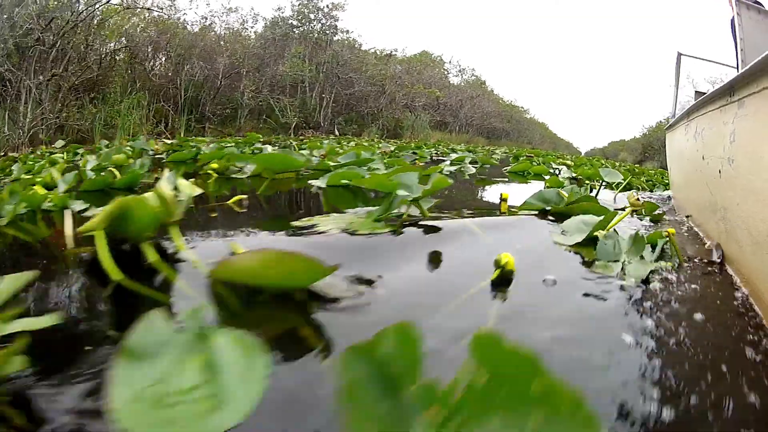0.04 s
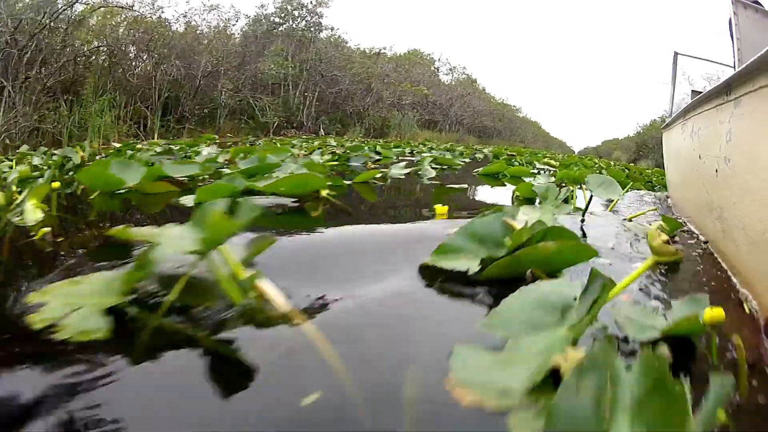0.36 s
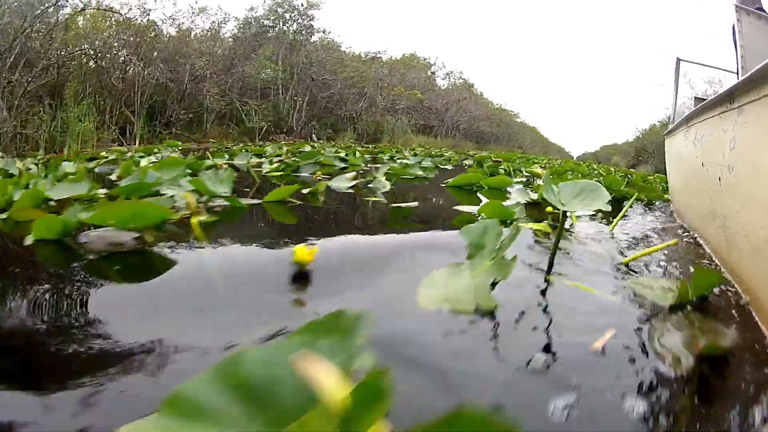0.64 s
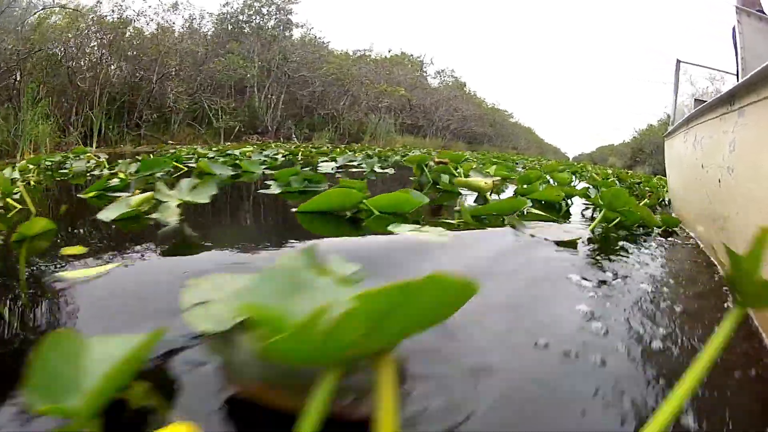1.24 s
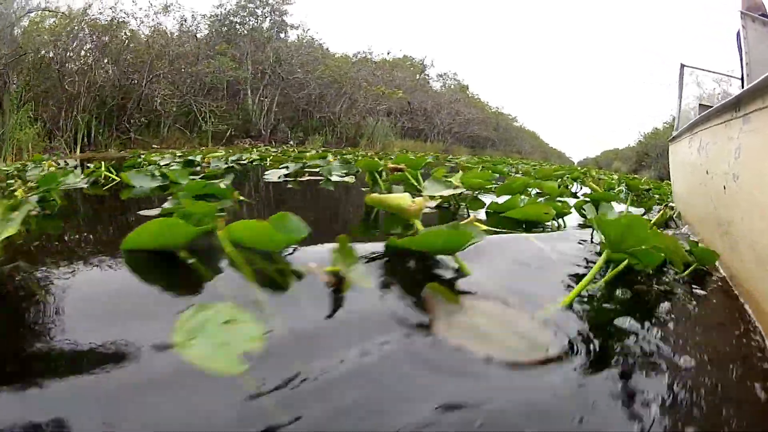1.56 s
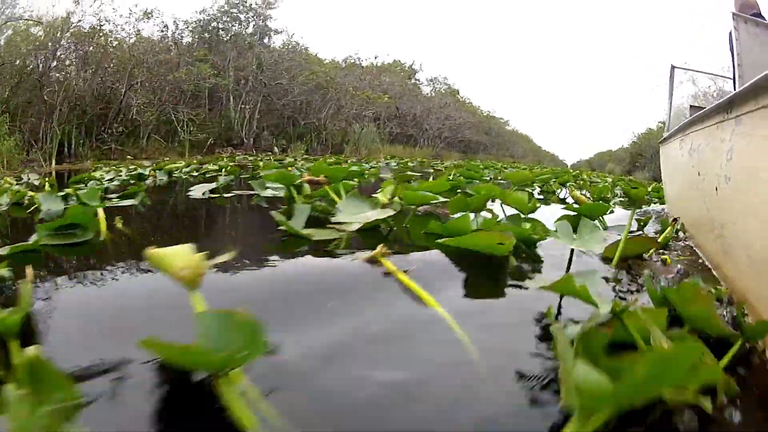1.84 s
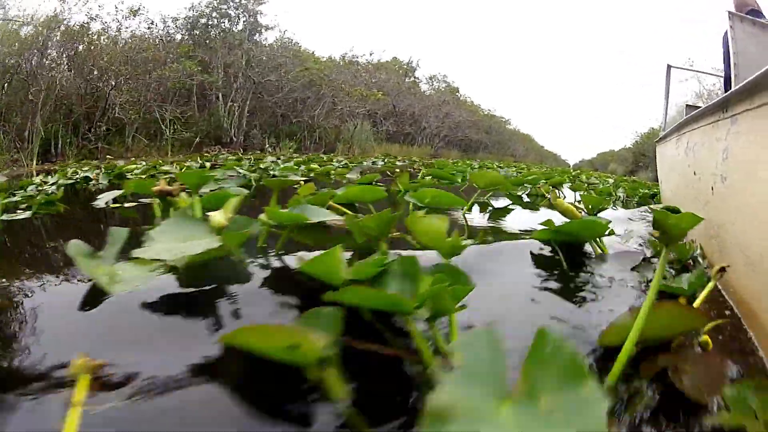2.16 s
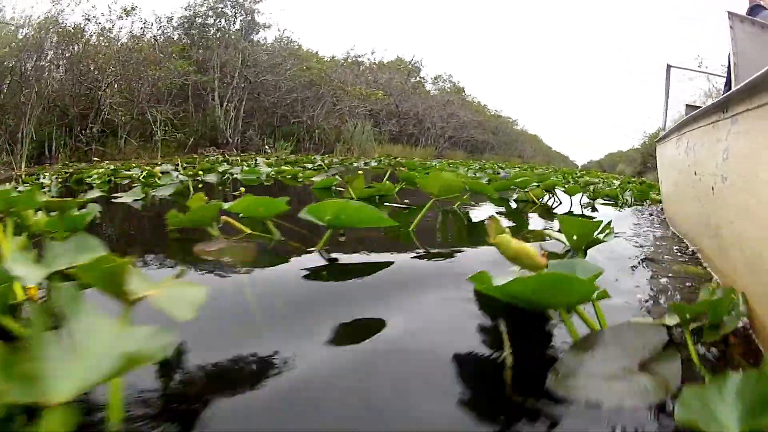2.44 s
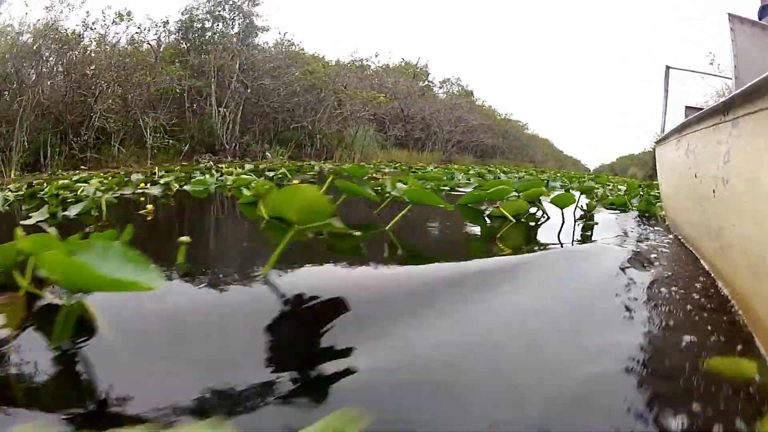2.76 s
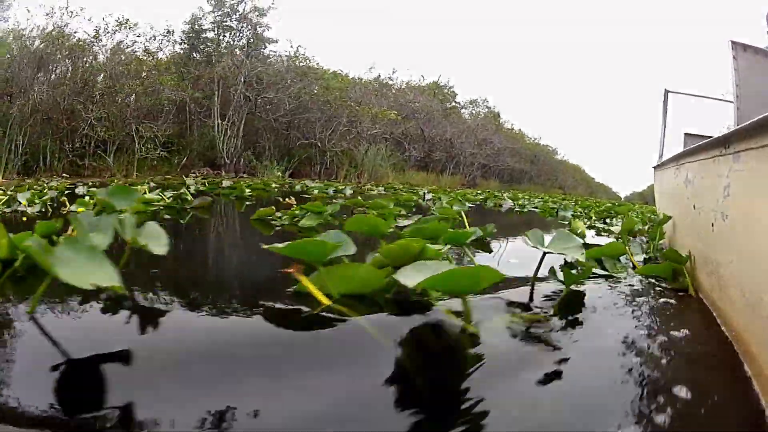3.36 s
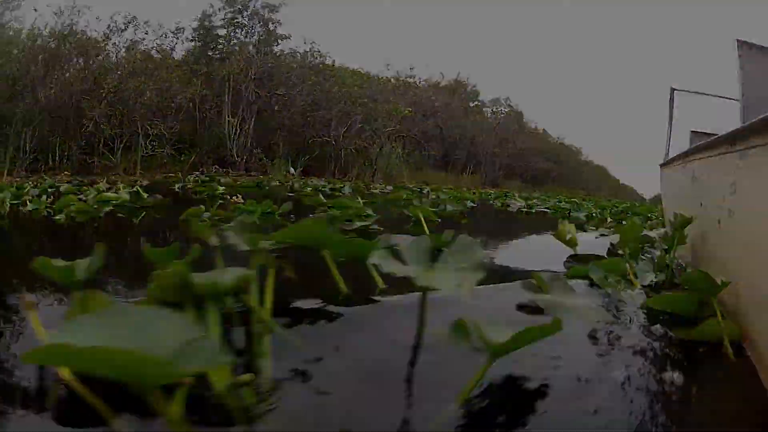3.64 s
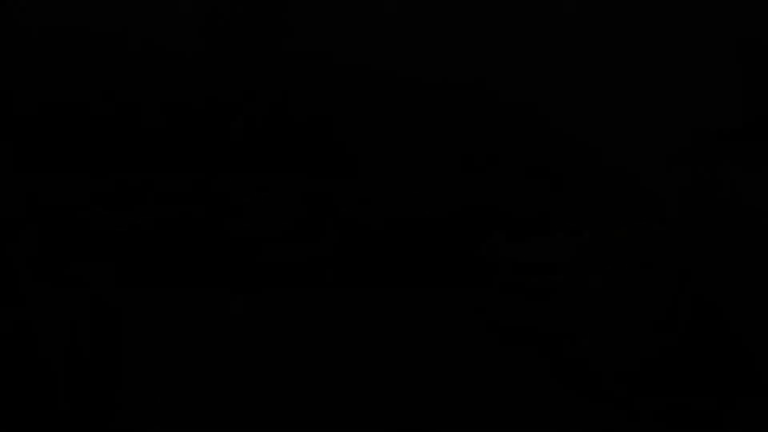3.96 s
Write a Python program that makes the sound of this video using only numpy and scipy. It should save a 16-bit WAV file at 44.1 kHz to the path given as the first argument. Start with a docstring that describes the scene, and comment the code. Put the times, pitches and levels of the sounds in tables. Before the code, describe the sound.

Heard from low beside the hull, an airboat goes from a deep, loping throb to a slightly distorted roar of engine and propeller. Softer spray hisses throughout, a few quick splashes come during the acceleration, and the sound fades away.

```python
"""Among lily pads, low beside the hull of a gliding airboat. Its V8 lopes through two open exhausts,
then the throttle opens and the two-bladed propeller roars: blade tones and chopped air that ring the
hull panels. Water sprays along the side, with a few bigger splashes as the revs climb. The overloaded
recorder clips and mirrors the roar faintly into the treble; the sound fades out at the end."""
import sys
import numpy as np
from scipy import signal
from scipy.fft import rfft, irfft, next_fast_len
from scipy.io import wavfile
from scipy.ndimage import uniform_filter1d, map_coordinates

SR = 44100
rng = np.random.default_rng(int(sys.argv[2]) if len(sys.argv) > 2 else 0)


def dump_mix(stems):
    """Bounce the given channels to the path in sys.argv[1] as a 16-bit WAV at rate SR."""
    frames = np.atleast_2d(stems).T  # one column per channel
    limited = np.clip(frames, -1, 1)  # hard clip at full scale
    pcm = np.round(limited * 32767).astype(np.int16)
    wavfile.write(sys.argv[1], SR, pcm)


N = 176400


def amp(db):
    return 10 ** (np.asarray(db) / 20)


def unit(x):
    return x / np.sqrt(np.mean(x ** 2) + 1e-20)


def curve(rows):
    """One value per sample from (t/s, value) points."""
    return np.interp(np.arange(N) / SR, *np.transpose(rows))


def wobble(rate):
    """A smooth random curve, rate knots a second."""
    return map_coordinates(rng.standard_normal(int(N * rate / SR) + 4), [np.arange(N) * rate / SR])


def coloured(x, points):
    """x through a causal EQ drawn from (f/Hz, level/dB) points."""
    m = 2 * next_fast_len(N)
    hz, db = np.transpose(points)
    gain_db = np.interp(np.log(np.fft.rfftfreq(m, 1 / SR) + 1), np.log(hz), db)
    cepstrum = irfft(np.log(amp(gain_db)))
    cepstrum[1:m // 2] *= 2  # folded for minimum phase
    cepstrum[m // 2 + 1:] = 0
    return irfft(rfft(x, m) * np.exp(rfft(cepstrum)))[:N]


def pulses(times, sizes):
    """Impulses shared between neighbouring samples."""
    keep = (times > 0) & (times < (N - 2) / SR)
    whole, part = np.divmod(times[keep] * SR, 1)
    whole, sizes = whole.astype(int), sizes[keep]
    return np.bincount(whole, sizes * (1 - part), N) + np.bincount(whole + 1, sizes * part, N)


# Punch of each cylinder, in firing order: light-throttle level/dB, open-throttle level/dB
CYLINDER_PUNCH = [(6.5, 4), (-2, -3), (0.5, -1.5), (5.5, 4.5), (1, -0.5), (6, 7), (-16, -3.5), (-4, -6)]
# Side of each cylinder, in firing order: 0 = near bank, 1 = far bank
CYLINDER_BANK = [0, 1, 0, 0, 1, 0, 1, 1]
# Boom of the pipes at light and at open throttle: f/Hz, relative level/dB
PIPE_LIGHT_EQ = [(15, -60), (25, -34), (36, -50), (55, -20.5), (78, -16), (100, -19), (125, -13.5),
                 (150, -15), (190, -29), (235, -30), (300, -37.5), (420, -46.5), (650, -62.5),
                 (1200, -86.5)]
PIPE_OPEN_EQ = [(15, -52), (25, -48), (36, -40), (55, -29), (78, -18), (100, -17.5), (125, -18),
                (150, -18.5), (190, -18.5), (225, -20.5), (300, -28), (420, -40.5), (650, -41),
                (1200, -80.5)]
# Gas rasping out with the strongest puffs: f/Hz, relative level/dB
RASP_EQ = [(100, -22.5), (300, 0.5), (550, -0.5), (680, -8), (900, -15), (1200, -18), (2500, -44.5)]


def exhaust(cycles, firing_hz, throttle, far_delay_s=.00517, jitter_s=.000133, scatter_db=1.27):
    """One puff per firing; the uneven banks make the lope, and the pipes brighten with the throttle."""
    t = np.arange(N) / SR
    cylinders = len(CYLINDER_PUNCH)
    firing = np.arange(-cylinders, cylinders * (int(cycles[-1]) + 1))
    cylinder = firing % cylinders
    chance = rng.standard_normal((len(firing), 2))
    times = np.interp(firing / cylinders + .817, cycles, t, left=-1)
    times = times + far_delay_s * np.take(CYLINDER_BANK, cylinder) + jitter_s * chance[:, 0]
    light_db, open_db = np.array(CYLINDER_PUNCH)[cylinder].T
    punch_db = light_db + (open_db - light_db) * np.interp(times, t, throttle)
    strength = amp(punch_db + scatter_db * chance[:, 1])
    puffs = pulses(times, strength / np.interp(times, t, firing_hz))
    puffs -= puffs.mean()
    boom = (1 - throttle) * coloured(puffs, PIPE_LIGHT_EQ) + throttle * coloured(puffs, PIPE_OPEN_EQ)
    gas = signal.lfilter([1], [1, -np.exp(-1 / (.006 * SR))], pulses(times, strength ** 2))  # 6 ms decay
    rasp = coloured(gas * rng.standard_normal(N), RASP_EQ)
    return amp(-15) * unit(boom) + amp(-42) * unit(rasp)


# Propeller drone: multiple of the blade rate, light-throttle level/dB, open-throttle level/dB
BLADE_HARMONICS = [(1, -36, -29.5), (2, -36.5, -34.5), (3, -35, -33.5), (4, -44, -38.5), (5, -33.5, -39),
                   (6, -37.5, -38), (7, -40, -37), (8, -45, -65), (9, -48.5, -49.5), (10, -55, -48)]


def blade_tones(blade_phase, throttle, waver_db=2.0, waver_rad=0.23):
    """Harmonics of the passing blades, unsteady in the disturbed air."""
    drone = np.zeros(N)
    for harmonic, light_db, open_db in BLADE_HARMONICS:
        level_db = light_db + (open_db - light_db) * throttle + waver_db * wobble(7.18)
        drone += np.sqrt(2) * amp(level_db) * np.cos(harmonic * blade_phase + waver_rad * wobble(12))
    return drone


# Body of the rushing air: f/Hz, relative level/dB
WASH_EQ = [(20, -37.5), (50, -11), (110, -5.5), (200, 1), (300, -3.5), (400, -6.5), (520, -10), (740, -12),
           (900, -20.5), (1150, -37.5), (2500, -56)]
# Swell of the rushing air: t/s, level/dB
WASH_SWELL = [(0, -31.5), (.6, -30), (.9, -27), (1.3, -28.5), (1.55, -27), (1.72, -23.5), (2.1, -27.5),
              (2.6, -26.5), (4, -25.5)]


def propeller_wash(blade_phase, chop_depth=0.3, flutter_db=0.7):
    """Turbulent air behind the propeller, chopped by each blade."""
    chop = 1 + chop_depth * np.cos(blade_phase)
    air = rng.standard_normal(N) * chop * amp(flutter_db * wobble(29.9))
    return amp(curve(WASH_SWELL)) * unit(coloured(air, WASH_EQ))


# Resonances of the hull panels: f/Hz, width/Hz, gain/dB
HULL_MODES = [(56.6, 7.3, 2), (224.6, 57, 0), (279, 23, -1), (376.2, 20, 4)]


def hull(propeller):
    """The propeller's sound plus the ring it excites in the hull panels."""
    m = 2 * next_fast_len(N)
    f = np.fft.rfftfreq(m, 1 / SR)
    ring = sum(amp(db) * 1j * f * width / (hz * hz - f * f + 1j * f * width)
               for hz, width, db in HULL_MODES)
    return irfft(rfft(propeller, m) * (1 + ring), m)[:N]


# Sizzle of the spray: f/Hz, relative level/dB
SPRAY_EQ = [(400, -23), (1000, -9.5), (1550, -5.5), (2000, -1), (2750, 0), (3200, -8), (3900, -7),
            (4700, -9), (5400, -18), (6100, -26.5), (7200, -14.5), (8200, -15), (10000, -19), (13000, -41),
            (15500, -36)]
# Swell of the spray: t/s, level/dB
SPRAY_SWELL = [(0, -45.5), (.55, -46.5), (.8, -44.5), (1.15, -45), (1.38, -43), (1.56, -40.5), (1.66, -37),
               (1.85, -41), (1.99, -39.5), (2.04, -42), (2.45, -42.5), (2.75, -41.5), (4, -43)]


def spray(drops_per_s=2200, drop_share=0.18, spread_db=1, flutter_db=1.12):
    """Droplets patter over a hiss of water along the hull."""
    count = int(drops_per_s * N / SR)
    sizes = amp(spread_db * np.minimum(rng.exponential(size=count), 4)) * rng.choice([-1, 1], count)
    drops = unit(pulses(rng.uniform(0, N / SR, count), sizes))
    water = np.sqrt(drop_share) * drops + np.sqrt(1 - drop_share) * rng.standard_normal(N)
    return unit(coloured(water, SPRAY_EQ)) * amp(curve(SPRAY_SWELL) + flutter_db * wobble(34.79))


# Splash hits: t/s, level/dB, decay/s
SPLASH_HITS = [(1.445, -46, .012), (1.464, -31.5, 0.0081), (1.492, -37, .012), (1.725, -34, 0.015)]
# Bright slap of a splash: f/Hz, relative level/dB
SPLASH_EQ = [(600, -28), (1600, -7), (2300, 10), (2800, 1), (3500, -18), (4800, -10), (6000, -26),
             (15000, -29)]


def splashes():
    """Bigger splashes of water: noise bursts with a hard attack and a short tail."""
    t = np.arange(N) / SR
    bursts = sum(amp(db) * (t > at) * np.exp(-np.abs(t - at) / decay) for at, db, decay in SPLASH_HITS)
    return bursts * unit(coloured(rng.standard_normal(N), SPLASH_EQ))


# The engine's rev-up, as its firing rate: t/s, f/Hz
REVS = [(0, 87.1), (0.3, 88.0), (0.55, 89.8), (0.8, 91.2), (1.1, 93.2), (1.3, 96.9), (1.45, 104.3),
        (1.6, 111.8), (1.75, 124.0), (1.9, 134.8), (2.05, 141.7), (2.25, 150.1), (2.5, 156.2),
        (2.75, 158.4), (3.1, 160.5), (3.5, 160.0), (3.75, 157.0), (4, 147.6)]


def scene(light_hz=83, open_hz=155.5, load_db=2.0, full_load_hz_per_s=48):
    """One engine speed drives the exhausts and the propeller; the engine works harder while it rises."""
    firing_hz = curve(REVS)
    cycles = np.cumsum(firing_hz) / SR / len(CYLINDER_PUNCH)
    throttle = np.clip((firing_hz - light_hz) / (open_hz - light_hz), 0, 1)
    climb_hz_per_s = uniform_filter1d(np.gradient(firing_hz) * SR, size=SR // 4)
    load_gain = amp(load_db * np.clip(climb_hz_per_s / full_load_hz_per_s, 0, 1))
    blade_phase = 2 * np.pi * (4 * cycles - 0.3023)  # four blade passes per engine cycle
    water = spray() + splashes()
    propeller = propeller_wash(blade_phase) + blade_tones(blade_phase, throttle)
    engine = load_gain * exhaust(cycles, firing_hz, throttle)
    return (water + hull(propeller) + engine)[None]


# Closing fade: t/s, gain/dB
FADE_OUT = [(2.82, -1.5), (3.0, -4.5), (3.25, -13.5), (3.5, -26.5), (3.72, -36.5), (3.84, -40), (4, -40)]


def record(dry, clip_level=.45, hardness=16, clock_hz=12000, swing_s=2.35e-5, top_hz=15350):
    """Peaks clip; a swinging sample clock mirrors the sound around its rate; then fade and high cut."""
    clipped = dry / (0.5 + np.abs(dry / clip_level) ** hardness) ** (1 / hardness)
    clock_offset_s = swing_s * np.cos(2 * np.pi * clock_hz * np.arange(N) / SR)
    mirrored = clock_offset_s * SR * np.gradient(clipped, axis=-1)
    faded = (clipped + mirrored) * amp(curve(FADE_OUT))
    m = 2 * next_fast_len(N)
    return irfft(rfft(faded, m) * (np.fft.rfftfreq(m, 1 / SR) < top_hz), m)[:, :N]


dry = scene()
out = record(dry)
dump_mix(out)
```